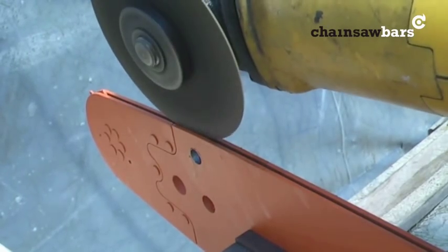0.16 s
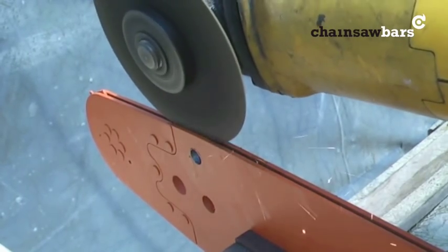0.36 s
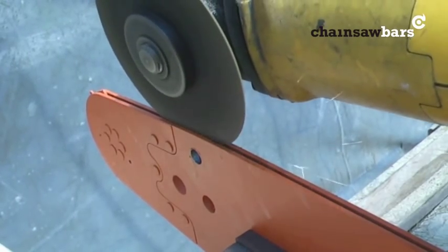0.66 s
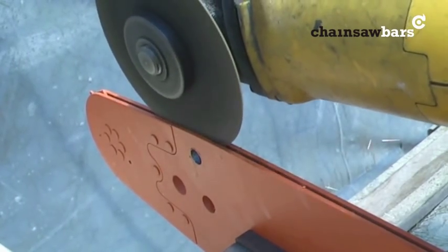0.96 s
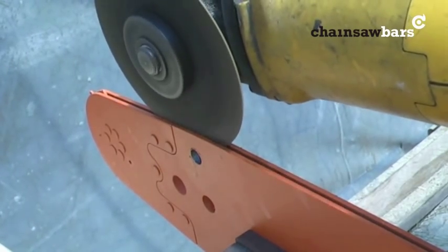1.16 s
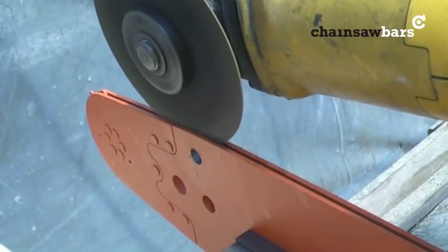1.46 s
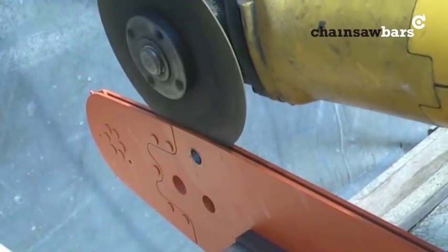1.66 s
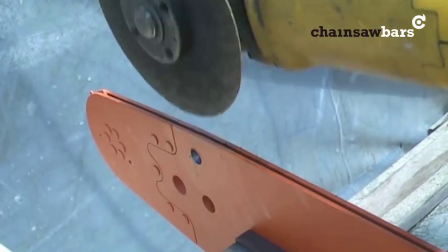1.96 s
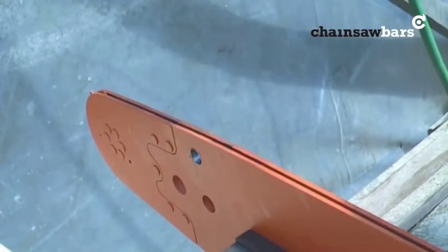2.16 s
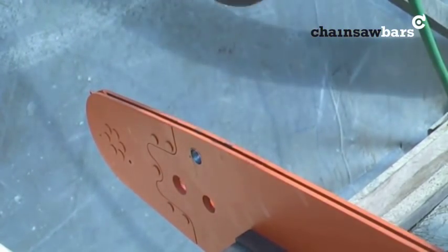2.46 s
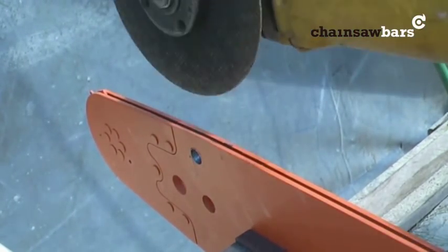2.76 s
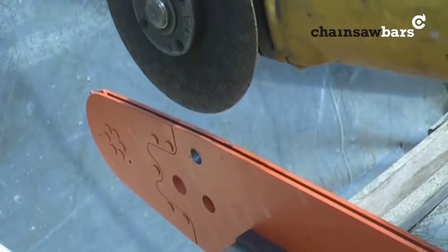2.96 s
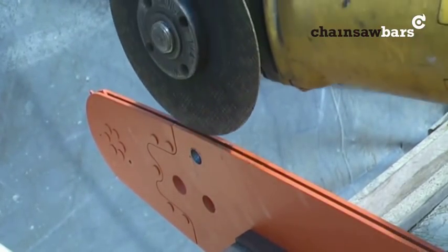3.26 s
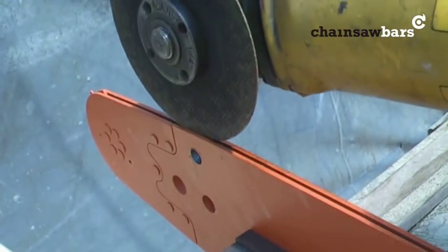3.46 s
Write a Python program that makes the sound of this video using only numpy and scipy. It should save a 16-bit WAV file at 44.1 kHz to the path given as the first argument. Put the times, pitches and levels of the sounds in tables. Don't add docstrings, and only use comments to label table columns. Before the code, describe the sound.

Angle grinder grinding thin steel, winding down to a jolt, then faint engine hum and taps

```python
import sys
import numpy as np
from scipy import signal
from scipy.fft import rfft, irfft, next_fast_len
from scipy.io import wavfile
from scipy.ndimage import uniform_filter1d, map_coordinates

SR = 44100
rng = np.random.default_rng(int(sys.argv[2]) if len(sys.argv) > 2 else 0)


def boost(x):
    u = np.asarray(x, float) / 20
    return 10 ** u


def file_out(sig):
    cols = np.atleast_2d(sig).T
    lim = np.clip(cols, -1, 1)
    pcm = np.round(lim * 32767).astype(np.int16)
    wavfile.write(sys.argv[1], SR, pcm)


N = 158760
T_S = np.arange(N) / SR

# time_s, speed_hz
SPIN_UP = [(0, 74.1), (.1, 81.96), (.16, 89.63), (.23, 95.5), (.33, 96.64), (.5, 97.65), (.66, 96.94)]
# time_s, speed_hz
COAST_DOWN = [(.8, 84), (1.0, 69), (1.22, 44), (1.38, 33), (1.5, 24), (1.62, 18.5), (1.73, 15),
              (1.799, 5.8)]
# time_s, grit_db, bar_vs_grit_db, edge_vs_grit_db
CONTACT = [(0, -15, -10, -2), (.015, -28, -12, -25), (.1, -17, -12.5, -5), (.115, -17.5, -10, -9.5),
           (.19, -23.5, -13, -5.5), (.27, -21, -8.5, -9), (.45, -18.5, -6.5, -10.5), (.64, -18, -16, -13.5),
           (.7, -17.5, -9.5, -13), (.85, -14.5, -18, -13), (1.1, -14, -13.5, -15), (1.25, -16, -5, -12.5),
           (1.42, -20, 2.5, -7), (1.6, -22, 4, -5), (1.7, -20.5, 2, -6), (1.76, -24, 1.5, -5.5),
           (1.79, -36, -16, -2), (1.81, -47.5, -24, -6)]
CONTACT_END = [(1.85, -51.5, -5, -8), (1.92, -53, -10, -8.5), (2, -100, 0, -2)]
# time_s, share_0_1
RIM_REPEAT = [
    (0, 0.05),
    (.18, .25),
    (.3, .75),
    (.5, .88),
    (.645, .88),
    (.69, .05),
    (.8, 0.0),
]
# rest_hz, width_hz, level_db, waves_round_rim
SPINNING_DISC = [(3140, 64, -17, 1.7), (3360, 110, -11, 1.8), (5504, 170, -1, 2.8), (6000, 59, 7.5, 3),
                 (6280, 120, 4, 5.2), (6593, 77, 2, 2), (6490, 200, -4.5, 1.7), (6980, 77, 10.5, 3.3),
                 (7490, 220, 0.5, 4), (7880, 230, 0.5, 2.6), (8460, 200, -5, 6.6), (8910, 120, -5.5, 5.7)]
# time_s, level_db, widening_factor
DISC_RING = [(0, -4, 1.1), (.104, -4, 1.1), (.112, 0, 1.1), (.62, -.5, 1.1), (.72, -2, 3.5),
             (1.0, -2.5, 4.5), (1.4, -2, 3.5), (1.8, -1.5, 3)]
# centre_hz, width_hz, level_db
BAR = [(694, 34, -10.5), (905, 50, -11), (1164.5, 9.2, 1), (1200, 27, -5), (1477, 140, 3.5), (1603, 79, 10),
       (1716, 170, 3.5), (1783, 20, 2.5), (2120, 68.7, -13.5), (2950, 54, -12.5), (4483, 120, -7)]
# centre_hz, width_hz, level_db
EDGE = [(2176, 63, 4.5), (2432, 84, 6), (2580, 130, -5), (2890, 140, 2.5), (1757, 110, -11.5)]
# freq_hz, density_db_per_hz
GRIT_HISS = [(300, -52), (900, -12), (3200, -2), (5000, -10), (7400, 0), (11000, -4.5), (13800, -1.5),
             (15800, -5)]
# centre_hz, width_hz, level_db
STILL_DISC = [(3250, 200, -6), (3780, 160, -7), (4550, 200, -8), (5700, 260, -7), (6710, 90, 1),
              (7240, 160, -3), (7750, 160, -4), (8600, 200, -5), (9050, 200, -8)]
# centre_hz, width_hz, level_db
FREE_BAR = [(969, 55, -2), (1150, 60, -6), (1490, 60, 0), (1670, 130, -4), (2000, 70, -4), (2200, 80, 0),
            (2890, 80, -6)]
# start_s, top_s, end_s, grit_db, bar_vs_grit_db
STROKES = [
    (1.92, 1.985, 1.993, -26, -6),
    (1.99, 2.0, 2.05, -45, 0.5),
    (3.515, 3.55, 3.63, -50, 1.5),
    (3.329, 3.338, 3.345, -53.5, 12.5),
]
# time_s, peak_db, bar_vs_disc_db
TAPS = [(0.0455, -6, -14), (0.072, -12, -12), (0.1116, -13, -8), (1.71, -15, -23.5), (2.2592, -57.5, -1),
        (2.7018, -47, -11), (3.3451, -28, -7.5), (3.4339, -60.5, -4), (3.535, -42.5, 3), (3.5742, -33, 9.5),
        (3.5818, -43.5, 12)]
# multiple_of_turn, start_s, end_s, level_db, blur_rad
MOTOR_TONES = [(2, .18, .76, -46.5, .1), (3, .2, 0.52, -50.5, 0.1), (4, 0.054, 0.8, -51.5, 0.1),
               (14, 0.085, 0.17, -34, 0.41), (14, 0.519, 0.672, -26, 0.12), (14, .27, 0.55, -36, .1),
               (18, 0.16, .5, -38.5, .25), (23, .29, 0.45, -33, 0.242), (25, 0.087, 0.29, -32.5, .7),
               (38, 0.31, 0.52, -34, .4), (76.3, .3, .66, -32, .6), (138, 0, .17, -40, .8),
               (135.4, 0.16, 0.78, -27, 5.3), (92, 0.35, 0.84, -29, 4.2), (92, .68, 1.08, -25.5, 3.6)]
# freq_hz, density_db_per_hz
FAN = [(60, -26.5), (120, -28.5), (300, -11.5), (520, -12.5), (900, -2), (1300, -8), (3300, -5.5),
       (6000, -19.5)]
# centre_hz, width_hz, level_db
BENCH = [(151, 20, -6), (215, 26, 0.5), (283, 40, 0.5), (356, 31, 6.5), (415, 33, 1), (730, 116, -3),
         (870, 19, -8)]
# time_s, level_db
ENGINE = [(1.78, -44), (1.844, -40), (2.342, -51), (2.742, -46.5), (2.752, -45), (3.6, -48)]
# multiple_of_cycle, level_db
ENGINE_ORDERS = [(8, -34), (12, -13.5), (16, -5.5), (17, -0.5), (20, -2.5), (21, -19.5), (24, -12),
                 (28, -14), (34, -15.5)]
# freq_hz, density_db_per_hz
YARD = [(88, -37), (150, -3), (209, -20.5), (347, -10.5), (483, -21.5), (660, -18.5), (757, -21.5),
        (5530, -35.5), (15800, -56.5)]
# freq_hz, likeness_0_1
NEAR = [(60, 0.51), (180, 0.4), (550, 0.65), (1100, .995), (2200, .96), (4970, .96), (9000, .93),
        (15000, 0.62)]
# freq_hz, likeness_0_1
FAR = [(60, 0.29), (120, .92), (240, 0.76), (600, 0.507), (950, 0.7), (3770, 0.74), (15000, 0.48)]

HIGH_SPOT_S, HIGH_SPOT_TURN = 1.71, 0.008
HIGH_SPOT_DB, HIGH_SPOT_SLOW_DB = 0.5, 3.5
BOUNCE_DB, BOUNCE_S = 5, .23
BITE_S, UNBITTEN_HISS_DB, UNBITTEN_FAN_DB = .108, -11, 6
RING_DB, SETTLE_S = 4, .2
DISC_DB, HISS_DB, BAR_DB, EDGE_DB, WANDER_DB = -2.5, -2.5, -3.5, -0.16, 2.2
TOUCH_HISS_DB, STILL_DISC_DB, FREE_BAR_DB = -5.5, -4, 2.5
STROKE_KNOCK_DB = -11
TAP_FALL_S = 0.0039
SCRAPE_DB, SCRAPE_LOW_HZ, SCRAPE_HIGH_HZ = -7, 900, 4800
PUFF_S, PUFF_DB, PUFF_FALL_S = 2.487, -55, .04
FAN_DB, FAN_POWER = -31.5, 1
THUD_S, THUD_DB, THUD_FALL_S = 1.785, -21, 0.0061
ROOM_DB, ROOM_T60_S = -14.5, 0.2
HALL_DB, HALL_T60_S = -35.5, .7
DUCKED_DB, DUCKED_AIR_DB, RECOVER_S = -59, -0.5, 1.69
CYCLE_HZ, BEAT_S = 6.69, 3.1
CYCLE_WANDER, ORDER_WANDER_DB, ORDER_SLIP_RAD = .003, 1.2, .2
YARD_DB, RUMBLE_DB = -51, -58.5
NOTCH_HZ, NOTCH_WIDTH_HZ, NOTCH_DB = 513.6, 28.5, -10.5
CUTOFF_HZ = 16050


def rms_one(x):
    return x / np.sqrt(np.mean(x ** 2) + 1e-20)


def in_time(rows):
    time_s, *columns = np.transpose(rows)
    return [np.interp(T_S, time_s, column) for column in columns]


def at_hz(points, hz):
    table_hz, value = np.array(points).T
    return np.interp(np.log(hz + 1), np.log(table_hz), value)


def colour(x, gain):
    size = next_fast_len(N + SR // 4)
    smooth = gain(np.fft.rfftfreq(size, 1 / SR))
    for _ in range(2):
        smooth = uniform_filter1d(smooth, size=40)
    return irfft(rfft(x, size) * smooth, size)[..., :N]


def band(x, low_hz, high_hz):
    return signal.sosfilt(signal.butter(2, [low_hz, high_hz], "band", fs=SR, output="sos"), x)


def drift(rate_hz):
    r = np.exp(-80 * np.pi * rate_hz / SR)
    slow = signal.lfilter([1], [1, -2 * r, r * r], rng.standard_normal(N // 40 + 2002))[2000:]
    return np.interp(np.arange(N) / 40, np.arange(len(slow)), rms_one(slow))


def resonator(hz, width_hz):
    r = np.exp(-np.pi * width_hz / SR)
    return [(1 - r * r) / 2, 0, (r * r - 1) / 2], [1, -2 * r * np.cos(2 * np.pi * hz / SR), r * r]


def body(x, peaks, wander_db):
    out, power = 0, 0
    for k, (hz, width_hz, db) in enumerate(peaks):
        b, a = resonator(hz, width_hz)
        drive = x * boost(wander_db * drift(13.6)) + 1e-18
        out = out + (-1) ** k * boost(db) * signal.lfilter(b, a, drive)
        power += boost(2 * db) * np.pi * width_hz / SR
    return out / np.sqrt(power)


def spread(pair, likeness):
    def alike(hz):
        return np.clip(at_hz(likeness, hz), 0, 1)

    mid = colour(pair[0], lambda hz: np.sqrt((1 + alike(hz)) / 2))
    side = colour(pair[1], lambda hz: np.sqrt((1 - alike(hz)) / 2))
    return np.array([mid + side, mid - side])


def steel():
    speed_hz, angle = turns()
    level_db, bend_db, edge_db = in_time(CONTACT + CONTACT_END)
    force = grit(speed_hz, angle) * boost(level_db)
    disc_touch, bar_touch, stroked = touches()

    hiss_power = np.mean(boost(2 * at_hz(GRIT_HISS, np.linspace(0, SR / 2, 500))))
    hiss_force = force * boost(UNBITTEN_HISS_DB * (T_S < BITE_S)) + boost(TOUCH_HISS_DB) * disc_touch
    hiss = colour(hiss_force, lambda hz: boost(at_hz(GRIT_HISS, hz)) / np.sqrt(hiss_power))

    out = boost(HISS_DB) * hiss
    out += boost(DISC_DB) * spinning_disc(force * boost(RING_DB * settling()), speed_hz)
    out += boost(BAR_DB) * body(force * boost(bend_db), BAR, WANDER_DB)
    out += boost(EDGE_DB) * body(force * boost(edge_db), EDGE, WANDER_DB)
    out += boost(STILL_DISC_DB) * body(disc_touch, STILL_DISC, 1.5)
    out += boost(FREE_BAR_DB) * body(bar_touch, FREE_BAR, 1.8)
    out += boost(STROKE_KNOCK_DB) * body(bar_touch, BENCH, 0)
    return out + motor(angle) + rasp(stroked)


def turns():
    speed_hz, = in_time(SPIN_UP + COAST_DOWN)
    angle = np.cumsum(speed_hz) / SR
    return speed_hz, angle - angle[int(HIGH_SPOT_S * SR)]


def grit(speed_hz, angle):
    share = np.clip(in_time(RIM_REPEAT)[0], 0, 1)
    rim_spectrum = boost(3 * rng.standard_normal(221)) * np.exp(2j * np.pi * rng.random(221))
    rim = rms_one(irfft(rim_spectrum))
    pattern = map_coordinates(rim, [angle % 1 * len(rim)], order=3, mode="grid-wrap")
    fresh = rms_one(rng.standard_normal(N) * boost(2.1 * rng.standard_normal(N)))

    depth_db = HIGH_SPOT_DB + HIGH_SPOT_SLOW_DB * (1 - speed_hz / speed_hz.max())
    depth_db += BOUNCE_DB * np.exp(-((T_S - BOUNCE_S) / 0.14) ** 2)
    swell = np.cos(2 * np.pi * (angle - HIGH_SPOT_TURN)) + .5 * np.cos(4 * np.pi * angle)
    swell += 0.74 * (1 - share) * drift(40.0)
    grains = np.sqrt(share) * pattern + np.sqrt(1 - share) * fresh
    return grains * boost(depth_db * (swell * 0.65 + 0.5559))


def settling():
    after_s = T_S - BITE_S
    return (after_s > 0) * np.exp(-(after_s / SETTLE_S) ** 2)


def spinning_disc(x, speed_hz):
    ring_db, widen = in_time(DISC_RING)
    out, power = np.zeros(N), 0
    for k, (hz, width_hz, db, waves) in enumerate(SPINNING_DISC):
        drive = x * boost(db + ring_db + WANDER_DB * drift(8.0)) / np.sqrt(widen)
        state = np.zeros(2)
        for i in range(0, 2 * SR, 512):
            b, a = resonator(hz + waves * speed_hz[i], width_hz * widen[i])
            part, state = signal.lfilter(b, a, drive[i:i + 512], zi=state)
            out[i:i + 512] += (-1) ** k * part
        power += boost(2 * db) * np.pi * width_hz / SR
    return out / np.sqrt(power)


def touches():
    disc, bar = np.zeros(N), np.zeros(N)
    for start_s, top_s, end_s, db, bar_db in STROKES:
        shape = np.interp(T_S, [start_s, start_s + .008, top_s, end_s], [0, .25, 1, 0]) * boost(db)
        disc = disc + shape
        bar = bar + shape * boost(bar_db)
    grains = rms_one(rng.standard_normal(N) * boost(3 * drift(200.0)))
    disc, bar = grains * disc, grains * bar
    stroked = bar * (T_S < 3)

    tap_noise = rng.standard_normal(N)
    for tap_s, db, bar_db in TAPS:
        fall = (T_S > tap_s) * np.exp(-np.maximum(T_S - tap_s, 0) / TAP_FALL_S)
        hit = fall * boost(db - 4.0) * tap_noise
        disc = disc + hit
        bar = bar + hit * boost(bar_db)
    return disc, bar, stroked


def rasp(stroked):
    t = T_S - PUFF_S
    puff = np.clip(t / 0.0071, 0, 1) * np.exp(-np.abs(t) / PUFF_FALL_S)
    brush = boost(PUFF_DB) * puff * rng.standard_normal(N)
    return 2 * band(boost(SCRAPE_DB) * stroked + brush, SCRAPE_LOW_HZ, SCRAPE_HIGH_HZ)


def motor(angle):
    out = np.zeros(N)
    for multiple, start_s, end_s, db, blur_rad in MOTOR_TONES:
        edges_s = [start_s - .03, start_s + .015, end_s - .02, end_s + .012]
        gate = np.interp(T_S, edges_s, [0, 1, 1, 0])
        phase = 2 * np.pi * round(multiple) * angle + blur_rad * drift(130.0)
        out += boost(db + 1.3 * drift(20.0)) * gate * np.sqrt(2) * np.sin(phase)
    return out


def fan():
    speed_hz, _ = turns()
    noise = rms_one(colour(rng.standard_normal((2, N)), lambda hz: boost(at_hz(FAN, hz))))
    alive = T_S < COAST_DOWN[-1][0]
    level_db = FAN_DB + UNBITTEN_FAN_DB * np.exp(-(T_S / 0.21) ** 4) + 1.7 * drift(41.0)
    level = boost(level_db) * alive * (speed_hz / speed_hz.max()) ** FAN_POWER
    return level * (noise + .5 * noise[::-1])


def thud():
    t = T_S - THUD_S
    push = np.where(t > 0, np.exp(-np.abs(t) / THUD_FALL_S), 0.24 * np.exp(-np.abs(t) / 0.11))
    return boost(THUD_DB) * body(push * rng.standard_normal(N), BENCH, 0)


def room(x):
    t = np.arange(int(.6 * SR)) / SR
    fall = boost(-60 * t / ROOM_T60_S) + boost(HALL_DB - ROOM_DB - 60 * t / HALL_T60_S)
    tail = rng.standard_normal((2, len(t))) * fall * (t > .006)
    tail = signal.lfilter([.5], [1, -.5], tail)
    return signal.fftconvolve(x[None], tail / np.sqrt(np.sum(tail ** 2) / 2), axes=1)[:, :N]


def yard():
    level_db, = in_time([(0, DUCKED_DB), (RECOVER_S, DUCKED_DB)] + ENGINE)
    duck_db, = in_time([(RECOVER_S, DUCKED_AIR_DB), (RECOVER_S + .1, 0)])
    cycles = np.cumsum(CYCLE_HZ * (1 + CYCLE_WANDER * drift(0.11))) / SR
    cycles = cycles - cycles[int(BEAT_S * SR)]
    engine = np.zeros(N)
    for multiple, db in ENGINE_ORDERS:
        phase = 2 * np.pi * round(multiple) * cycles + ORDER_SLIP_RAD * drift(2.7)
        engine += boost(db + ORDER_WANDER_DB * drift(1.6)) * np.cos(phase)

    def air_gain(hz):
        return boost(at_hz(YARD, hz)) * (hz / 150) ** 2 / (1 + (hz / 150) ** 2)

    air = rms_one(colour(rng.standard_normal((2, N)), air_gain))
    rumble = rms_one(band(rng.standard_normal((2, N)), 35, 200))
    noise = boost(YARD_DB + .5 * drift(10)) * air + boost(RUMBLE_DB) * rumble
    return boost(level_db) * rms_one(engine) + spread(boost(duck_db) * noise, FAR)


def scene():
    near = steel() + thud()
    bench = spread([near, near * drift(45.0)], NEAR)
    return bench + boost(ROOM_DB) * room(near) + fan() + yard()


def low_pass(x):
    return signal.sosfilt(signal.butter(12, 16000, fs=SR, output="sos"), x)


def record(dry):
    notched = colour(dry, lambda hz: boost(NOTCH_DB * np.exp(-((hz - NOTCH_HZ) / NOTCH_WIDTH_HZ) ** 2)))
    limited = .9 * np.tanh(notched / .9)
    top_cut = signal.ellip(10, .5, 60, CUTOFF_HZ + 250, fs=SR, output="sos")
    finished = signal.sosfilt(top_cut, limited)
    return low_pass(finished)


dry = scene()
out = record(dry)
file_out(out)
```